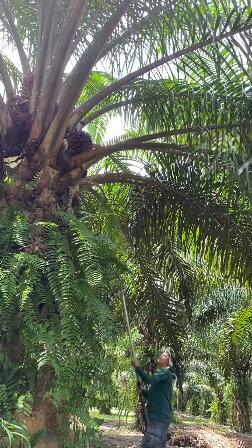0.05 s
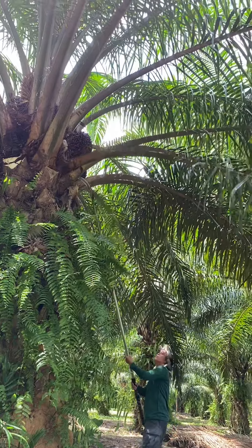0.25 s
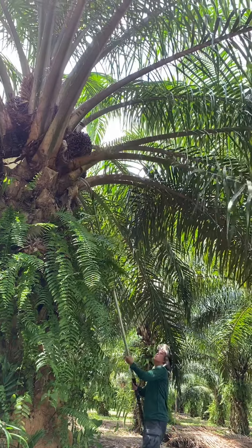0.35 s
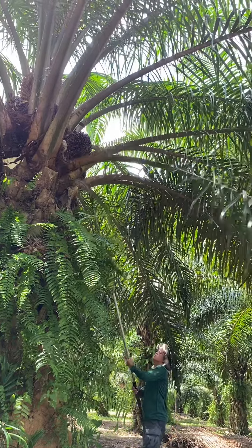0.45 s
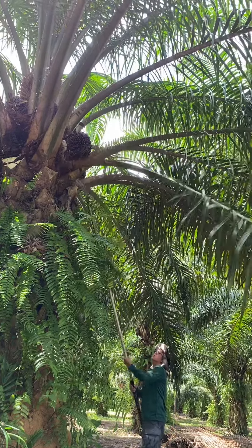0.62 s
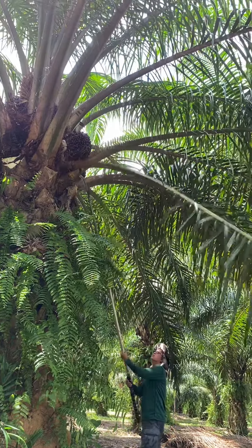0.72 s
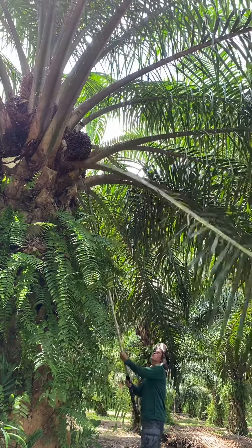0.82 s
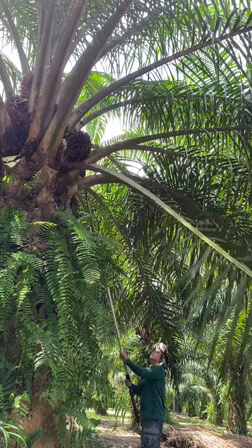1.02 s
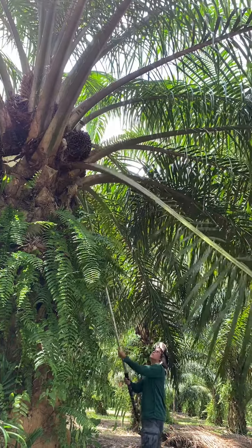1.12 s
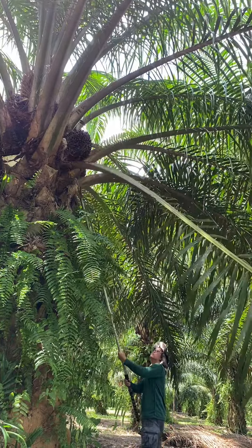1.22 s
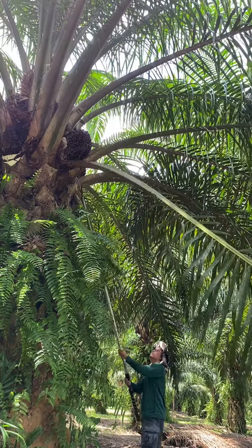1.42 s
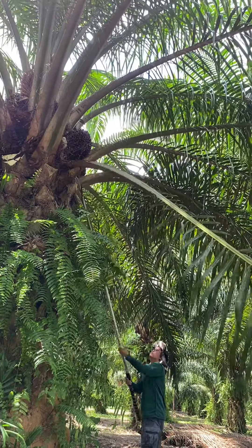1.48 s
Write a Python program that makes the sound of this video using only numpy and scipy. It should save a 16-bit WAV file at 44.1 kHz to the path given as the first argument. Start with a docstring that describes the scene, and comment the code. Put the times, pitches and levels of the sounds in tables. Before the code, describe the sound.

Woody cracking of a cut palm frond breaking away, with rustling leaves and a faint distant engine drone

```python
"""A low drone wavers far off in the rush of a plantation while the leaflets of a palm frond swish and tick.
After two faint early leaf ticks the frond, cut at its base with a pole sickle, tears away in woody cracks.
Each tick or crack is a burst of snaps ringing through resonances, with a thud that falls in pitch.
The ground and the palms around throw them back; swish and air are shaped noise, the engine is sines."""
import sys
import numpy as np
from scipy import signal
from scipy.fft import rfft, irfft, next_fast_len
from scipy.io import wavfile

SR = 44100
rng = np.random.default_rng(int(sys.argv[2]) if len(sys.argv) > 2 else 0)


def put_to_file(sound):
    """Save the sound as 16-bit audio at rate SR, in the file named by the first command-line argument."""
    columns = np.atleast_2d(sound).T  # one column per channel
    safe = np.clip(columns, -1, 1)
    whole_steps = np.round(safe * 32767)
    wavfile.write(sys.argv[1], SR, whole_steps.astype(np.int16))


N = 68355
TIME = np.arange(N) / SR

# far engine's loudness: (time [s], level [dB])
ENGINE_LEVEL = [(0, -44.5), (.13, -49.5), (.27, -39.5), (.45, -44.5), (.75, -47.5), (1.05, -42),
                (1.3, -46.5), (1.55, -49.5)]
# engine harmonics: (multiple of its pitch [ratio], level [dB])
ENGINE_ORDERS = [(1, 1), (2, -17), (3, -12.5)]
# second hum, gliding mostly upward: (time [s], pitch [Hz], level [dB])
DRONE = [(0, 78.1, -61), (.5, 80.65, -43), (.75, 87, -53), (1.05, 100.3, -46), (1.3, 100.7, -45),
         (1.55, 93.7, -42)]
ENGINE_HZ, ENGINE_WANDER = 58.7, .0168  # wander as a share of the pitch

# still air of the plantation: (frequency [Hz], relative density [dB per Hz])
AIR_SPECTRUM = [(25, -3), (38, 5), (52, 21), (80, 22.5), (140, 12), (300, 3.5), (600, -2), (2000, -19),
                (5500, -6.5), (9000, -19.5), (12000, -9.5), (16000, -50)]
AIR_DB = -49.5

# leaflets sweeping: (time [s], level [dB])
SWISH_LEVEL = [(0, -47), (.06, -49), (.13, -52), (.24, -41.5), (.38, -44.5), (.5, -43), (.69, -38.5),
               (.74, -42), (.87, -40.5), (.93, -40), (1.07, -47.5), (1.28, -55.5), (1.55, -60)]
# colour of the swish: (frequency [Hz], relative density [dB per Hz])
SWISH_SPECTRUM = [(40, -12), (150, 16), (300, 15.5), (550, 9), (1000, 10), (2000, 6), (3500, 5), (6000, 4),
                  (10000, -6), (16000, -8)]
SWISH_DB, SWISH_FLICKER_DB = 1.5, 2.5
SWISH_BRIGHT_HZ, SWISH_BRIGHTENS = 9000, .4  # treble drops this many extra dB per dB below the peak
TICKS_PER_S, TICK_DB = 330, -6
TICK_SPREAD_DB, TICK_SPREAD_CAP = 1, 4  # cap in multiples of the spread

# two faint early leaf ticks, then the stalk cracks (the row at 0.9 s is a close echo of the crack just before
# it): # (time [s], tearing time [s], thud pitch [Hz], knock pitch [Hz], snap pitch [Hz], # thud level [dB],
# knock level [dB], clack level [dB], snap level [dB], splinter level [dB], fizz level [dB])
TICKS_AND_CRACKS = [(0.034, 0.001, 251, 1090, 2970, -54.5, -51, -60, -66, -99, -49),
                    (0.064, 0.0024, 230, 840.0, 2920, -55.5, -55.5, -51, -73, -72, -47),
                    (0.15, 0.0012, 230, 910, 2540, -58, -57, -48.0, -50, -70, -55),
                    (0.197, 0.0023, 265, 750, 2980, -52, -44, -50.0, -50, -50, -39),
                    (0.2137, 0.0059, 186, 646, 3120, -31.5, -33.5, -42, -47.5, -49.0, -47),
                    (0.285, 0.0015, 243, 780, 2920, -42, -36, -44, -52, -48.0, -44.5),
                    (0.3651, 0.0032, 195, 890, 2730, -42.5, -52, -38.5, -42, -46.5, -50.5),
                    (0.443, 0.0016, 292, 960, 3770, -36, -33.5, -36.5, -27.5, -31.0, -31),
                    (0.539, 0.0031, 269, 970, 3300, -47, -38, -39.5, -35.0, -38.0, -36),
                    (0.583, 0.00088, 252, 1090, 3380.0, -65, -44.0, -50, -47.0, -59, -42),
                    (0.599, 0.0032, 244, 940, 3500, -49, -44, -52, -34, -36.5, -37.5),
                    (0.619, 0.001, 246, 810.0, 3400, -53, -69, -50, -39, -48, -45),
                    (0.6339, 0.0017, 310, 800, 3400, -46, -24.5, -28.0, -28, -35.0, -36.5),
                    (0.646, 0.0015, 183, 875, 3420, -27.5, -25.0, -27.5, -23.5, -27.0, -32.0),
                    (0.6553, 0.008, 296, 830, 3360, -33.5, -37.5, -50, -46, -33, -34),
                    (0.683, 0.0016, 258, 915, 3040.0, -48, -44, -69, -41.5, -44.0, -43.0),
                    (0.751, 0.0027, 288, 945, 3070, -38, -30.0, -35.5, -32.5, -33.5, -34),
                    (0.7872, 0.0022, 186, 1010, 3400, -32, -32, -30.5, -27.5, -28.5, -28.5),
                    (0.7936, 0.00068, 278, 970, 3600, -31.5, -32, -43, -32, -31.5, -38),
                    (0.8446, 0.00099, 249, 1090, 3160, -68, -36, -34.5, -33.0, -40, -47),
                    (0.871, 0.00053, 250, 1090.0, 2780, -63, -56, -50, -48.0, -45, -47),
                    (0.8879, 0.00069, 244, 1050, 2940, -36, -27, -23.5, -28.5, -35, -36.5),
                    (0.8955, 0.00065, 240, 1170, 3040, -41, -27.5, -22, -33.5, -38.0, -36),
                    (0.9, 0.0027, 256, 1040, 2540, -37, -28, -44, -31, -30.5, -36.5),
                    (0.927, 0.00091, 255, 1150, 2870, -67, -64, -56, -43, -46, -45),
                    (0.933, 0.0022, 255, 1140, 3640, -66, -57, -39, -40.5, -49, -44),
                    (0.9587, 0.00077, 250, 970, 3450, -40.5, -39, -36, -36.0, -30.5, -30),
                    (0.973, 0.0013, 243, 910, 3150.0, -44, -41.5, -58, -44.5, -53, -56),
                    (1.0061, 0.00076, 250, 765, 3500, -37.5, -37, -41, -31, -32.5, -37.5),
                    (1.06, 0.0019, 254.2, 760, 2880, -47.5, -50, -49, -47, -49.5, -50.5),
                    (1.231, 0.015, 231, 930, 3090.0, -54.5, -50, -69, -72, -53, -55),
                    (1.392, 0.0075, 262, 803, 3600, -81, -58, -57, -59, -57, -75)]
# knocking wood: (multiple of knock pitch [ratio], width [Hz], level [dB])
KNOCK_MODES = [(.6, 303, -1.5), (1.0, 456, 9), (1.35, 400, -1.5)]
# hard rind: (frequency [Hz], width [Hz], level [dB])
CLACK_MODES = [(1390, 676, 0), (1760, 930, -3.5)]
# snapping fibres: (multiple of snap pitch [ratio], width [Hz], level [dB])
SNAP_MODES = [(.8, 710, -2), (1.0, 700, 3), (1.15, 700, -1.5)]
# splinters of the rind: (frequency [Hz], width [Hz], level [dB])
SPLINTER_MODES = [(4620, 880, 1), (6550, 880, -1.1)]
# finest fibres: (frequency [Hz], width [Hz], level [dB])
FIZZ_MODES = [(7240, 7000, -6), (10500, 3500, 1.5), (15600, 820, -6.5)]
# boom of the whole stalk: (frequency [Hz], width [Hz], level [dB])
THUD_MODES = [(362, 80, 1)]
SNAPS_PER_S, SNAP_SHARE = 9000, .59  # small snaps; starting spread against a first snap of 1
# the bending wave behind the thud
THUD_START_HZ, THUD_TOP_HZ, THUD_FALL_S, THUD_RISE_S = 560, 400, .0055, .0053

# clean bounce off the ground, and its smear in the leaf litter
GROUND_S, GROUND_SMEAR_S, GROUND_BAND_HZ = .0035, .0008, (350, 6000)
GROUND_DB, LITTER_DB = -8.5, -9
# nearby leaves and trunk, then the wider grove
SCATTER_DB, SCATTER_T60_S, SCATTER_ABOVE_HZ, SCATTER_CUT_HZ = -6, .19, 2300, 10100
GROVE_DB, GROVE_T60_S, GROVE_CUT_HZ = -16, .41, 14000

LEFT_DB, LEFT_LEAD_S = 1.5, .00004
SPREAD_HZ = 470  # diffuse sound grows alike on both sides below this
PHASE_HZ, PHASE_WIDTH_HZ = 1250, 380
TREBLE_SPLIT_HZ, TREBLE_LAG_SAMPLES, TREBLE_WIDTH = 5790, 12, .13
CUTOFF_HZ = 16200


def from_db(db):
    """Decibels to gain."""
    return 10 ** (np.asarray(db) / 20)


def rms_one(x):
    """Scale to rms 1."""
    return x / np.sqrt(np.mean(x ** 2) + 1e-20)


def at_level(x, db):
    """Scale a short sound so its energy, spread over a hundredth of a second, has this rms level."""
    return from_db(db) * x / np.sqrt(np.sum(x ** 2) / (SR / 100) + 1e-20)


def in_time(rows):
    """Draw each column of a curve at every sample."""
    s, *columns = np.transpose(rows)
    return [np.interp(TIME, s, column) for column in columns]


def drift(rate):
    """Random curve through rate knots a second, with spread 1 at the knots."""
    knots = rng.standard_normal(1000)
    return np.interp(TIME * rate, np.arange(len(knots)), knots)


def cut(x, hz, kind, order=2):
    """Butterworth filter."""
    sos = signal.butter(order, np.clip(hz, 10, SR / 2 - 500), kind, fs=SR, output="sos")
    return signal.sosfilt(sos, x)


def delayed(x, s):
    """The same sound s seconds later."""
    return np.interp(TIME - s, TIME, x, left=0)


def diffuse(size):
    """Stereo noise: alike on both sides in the bass, different higher up."""
    mid, side = rng.standard_normal((2, size))
    side = cut(side, SPREAD_HZ, "high", order=1)
    return np.array([mid + side, mid - side])


def coloured(x, spectrum):
    """Give noise a spectrum, drawn over log frequency; rms 1."""
    hz, db = np.transpose(spectrum)
    size = next_fast_len(N + SR // 10)
    bins_hz = np.arange(size // 2 + 1) * SR / size + 1  # 1 Hz up, to avoid log of zero
    gain = from_db(np.interp(np.log(bins_hz), np.log(hz), db))
    return rms_one(irfft(rfft(x, size) * gain, size)[..., :N])


def resonate(x, modes):
    """Two-pole resonances side by side, with alternating signs."""
    out = 0
    for k, (hz, width, db) in enumerate(modes):
        r = np.exp(-np.pi * width / SR)
        poles = [1, -2 * r * np.cos(2 * np.pi * hz / SR), r * r]
        ringing = signal.lfilter([1, 0, -1], poles, x + 1e-18)
        out = out + (-1) ** k * from_db(db) * (1 - r * r) / 2 * ringing
    return out


def pitched(modes, pitch_hz):
    """Set resonances given as ratios to a pitch."""
    return [(pitch_hz * ratio, width, db) for ratio, width, db in modes]


def far_engine():
    """Harmonics of one wavering pitch make a low drone; a second hum climbs above it, then eases back."""
    level_db, = in_time(ENGINE_LEVEL)
    turn = 2 * np.pi * np.cumsum(ENGINE_HZ * (1 + ENGINE_WANDER * drift(5.7))) / SR
    engine = sum(from_db(level_db + db) * np.sin(multiple * turn) for multiple, db in ENGINE_ORDERS)
    hum_hz, hum_db = in_time(DRONE)
    hum = from_db(hum_db) * np.sin(2 * np.pi * np.cumsum(hum_hz) / SR)
    return engine + hum


def air():
    """Steady diffuse noise, coloured as the background rush of the plantation."""
    return from_db(AIR_DB) * coloured(diffuse(N), AIR_SPECTRUM)


def leaflet_ticks():
    """Leaflets flick against each other: random clicks, each dealt to one of ten broad resonances."""
    spread_db = TICK_SPREAD_DB * np.minimum(rng.exponential(1, N), TICK_SPREAD_CAP)
    sizes = from_db(spread_db) * rng.choice([-1, 1], N)
    flicks = sizes * (rng.random(N) < TICKS_PER_S / SR)
    pitches_hz = np.geomspace(1200, 14000, 10)
    dealt = rng.integers(0, 10, N)
    ticks = 0
    for k, hz in enumerate(pitches_hz):
        ticks = ticks + resonate(flicks * (dealt == k), [(hz, hz / 3, -10 * np.log10(hz))])
    return rms_one(ticks)


def leaflets():
    """Leaflets slide over each other as flickering noise and tick; their treble grows with loudness."""
    level_db, = in_time(SWISH_LEVEL)
    flicker_db = SWISH_FLICKER_DB * drift(90)
    swish = coloured(diffuse(N), SWISH_SPECTRUM) * from_db(SWISH_DB + flicker_db)
    ticks = leaflet_ticks() * from_db(level_db + TICK_DB)
    rustle = swish * from_db(level_db) + outdoors(ticks)
    dimming = from_db(SWISH_BRIGHTENS * (level_db - level_db.max()))
    top = cut(rustle, SWISH_BRIGHT_HZ, "high", order=3) * dimming
    return cut(rustle, SWISH_BRIGHT_HZ, "low", order=3) + top


def snap_burst(t, tear_s):
    """One full snap, then a dying random spray of smaller ones."""
    sizes = SNAP_SHARE * rng.standard_normal(len(t))
    snaps = sizes * (rng.random(len(t)) < SNAPS_PER_S / SR) * np.exp(-t / tear_s)
    snaps[0] = 1
    return snaps


def falling_thud(t, thud_hz):
    """A bending wave swells and dies while sliding down to its pitch, lows last, and rings a low boom."""
    bend_hz = thud_hz + (THUD_START_HZ - thud_hz) * np.exp(-t / THUD_FALL_S)
    bend = np.sin(2 * np.pi * np.cumsum(bend_hz) / SR) * t * np.exp(-t / THUD_RISE_S)
    return cut(bend + resonate(bend, THUD_MODES), THUD_TOP_HZ, "low", order=5)


def leaf_ticks_and_stalk():
    """Two faint leaf ticks, then the stalk's cracks and one close echo: each a snap burst ringing in five
    bands, plus a thud."""
    t = TIME[:SR // 10]
    out = np.zeros(N + SR)
    for s, tear_s, thud_hz, knock_hz, snap_hz, thud_db, *levels_db in TICKS_AND_CRACKS:
        snaps = snap_burst(t, tear_s)
        knock = cut(resonate(snaps, pitched(KNOCK_MODES, knock_hz)), [400, 1600], "band")
        clack = cut(resonate(snaps, CLACK_MODES), [1100, 2700], "band")
        snap = cut(resonate(snaps, pitched(SNAP_MODES, snap_hz)), [2100, 4500], "band", order=3)
        splinter = cut(resonate(snaps, SPLINTER_MODES), [4200, 8500], "band", order=3)
        fizz = cut(resonate(snaps, FIZZ_MODES), 10200, "high")
        parts = (knock, clack, snap, splinter, fizz)
        ringing = sum(at_level(part, db) for part, db in zip(parts, levels_db))
        start = int(s * SR)
        out[start:start + len(t)] += ringing + at_level(falling_thud(t, thud_hz), thud_db)
    return out[:N]


def ground_bounce(x):
    """The ground returns a band-limited copy, and leaf litter smears it with a brief burst of noise."""
    t = TIME[:SR // 100]
    litter = rms_one(diffuse(len(t)) * np.exp(-t / GROUND_SMEAR_S)) / np.sqrt(len(t))
    bounce = cut(delayed(x, GROUND_S), GROUND_BAND_HZ, "band")
    smeared = signal.fftconvolve(bounce[None], litter, axes=1)[:, :N]
    return from_db(GROUND_DB) * bounce + from_db(LITTER_DB) * smeared


def echoes(x, t60_s, top_hz):
    """Dense reflections as decaying noise, different on each side, losing 60 dB in t60_s."""
    t = TIME[:SR // 2]
    fade = from_db(-60 * t / t60_s) * (1 - np.exp(-t / .001))
    tail = cut(diffuse(len(t)), top_hz, "low", order=1) * fade
    return signal.fftconvolve(x[None], rms_one(tail) / np.sqrt(len(t)), axes=1)[:, :N]


def outdoors(x):
    """Direct sound, left side first, a ground bounce, bright scatter from near leaves and the grove's tail."""
    direct = np.array([x, delayed(x, LEFT_LEAD_S)])
    ground = ground_bounce(x)
    scatter = echoes(cut(x, SCATTER_ABOVE_HZ, "high"), SCATTER_T60_S, SCATTER_CUT_HZ)
    grove = echoes(x, GROVE_T60_S, GROVE_CUT_HZ)
    return direct + ground + from_db(SCATTER_DB) * scatter + from_db(GROVE_DB) * grove


def scene():
    """The frond, a little to the left, over the engine and the air."""
    frond = outdoors(leaf_ticks_and_stalk()) + leaflets()
    balance = from_db([[LEFT_DB / 2], [-LEFT_DB / 2]])
    return frond * balance + far_engine() + air()


def record(dry):
    """Two microphones differ in mid phase and share most treble, later on the left; the top is cut."""
    r = np.exp(-np.pi * PHASE_WIDTH_HZ / SR)
    poles = [1, -2 * r * np.cos(2 * np.pi * PHASE_HZ / SR), r * r]
    left = signal.lfilter(poles[::-1], poles, dry[0])  # all-pass: turns phase, keeps level
    body = cut(np.array([left, dry[1]]), TREBLE_SPLIT_HZ, "low", order=6)
    # the left channel's treble is heard on both sides, the right's is their small difference
    shared, apart = cut(dry, TREBLE_SPLIT_HZ, "high", order=6) * from_db(-1)
    left_treble = delayed(shared + TREBLE_WIDTH * apart, TREBLE_LAG_SAMPLES / SR)
    right_treble = shared - TREBLE_WIDTH * apart
    top_cut = signal.ellip(10, .2, 80, CUTOFF_HZ, fs=SR, output="sos")
    return signal.sosfilt(top_cut, body + np.array([left_treble, right_treble]))


dry = scene()
out = record(dry)
put_to_file(out)
```